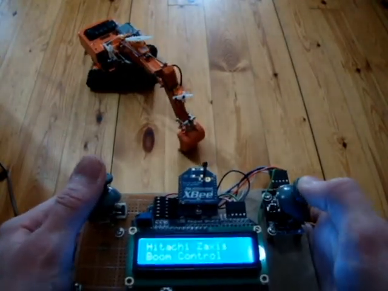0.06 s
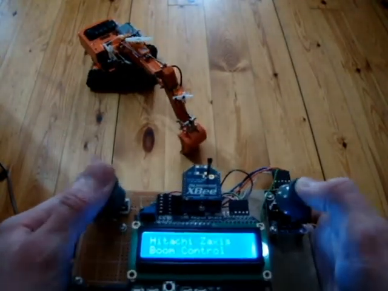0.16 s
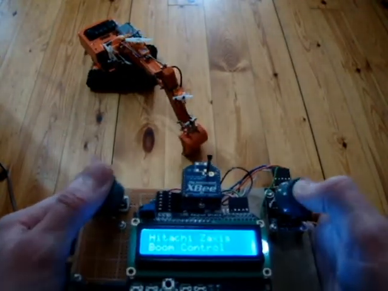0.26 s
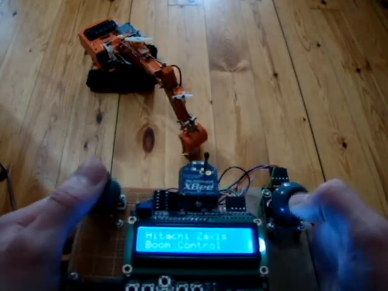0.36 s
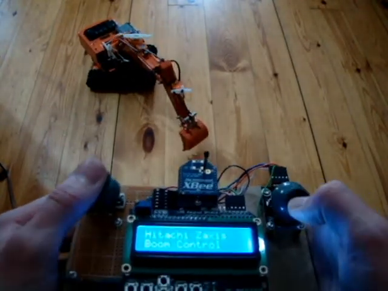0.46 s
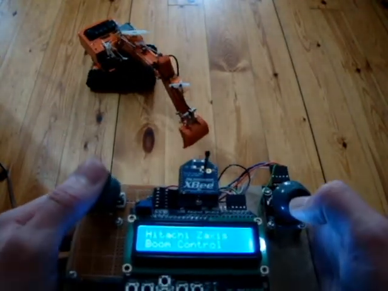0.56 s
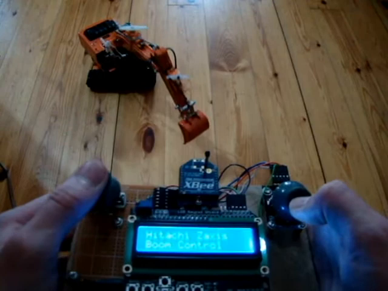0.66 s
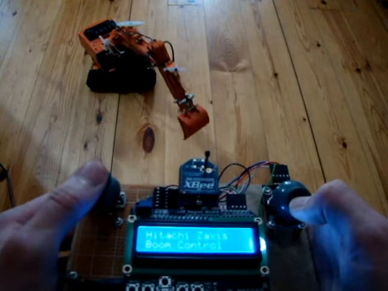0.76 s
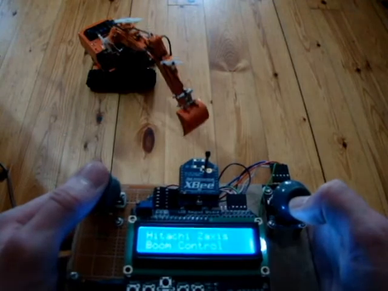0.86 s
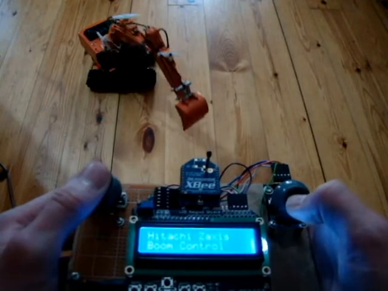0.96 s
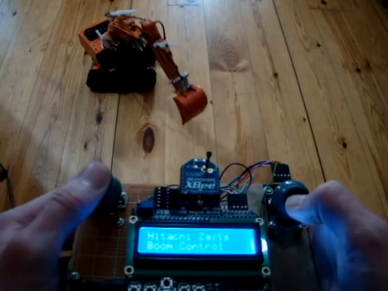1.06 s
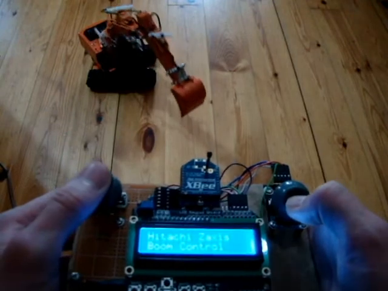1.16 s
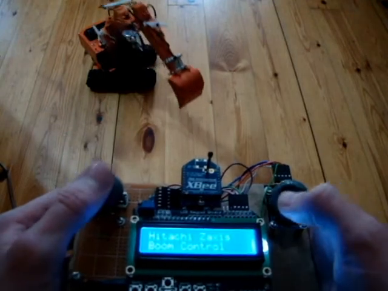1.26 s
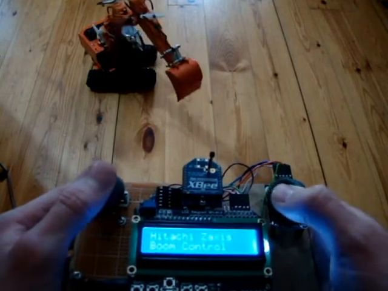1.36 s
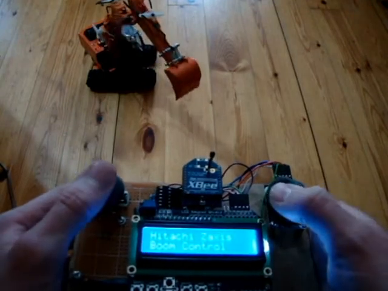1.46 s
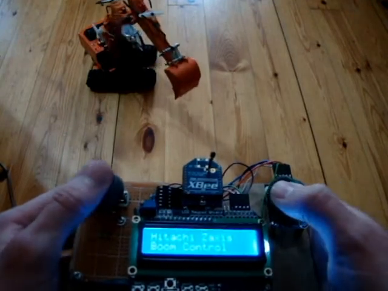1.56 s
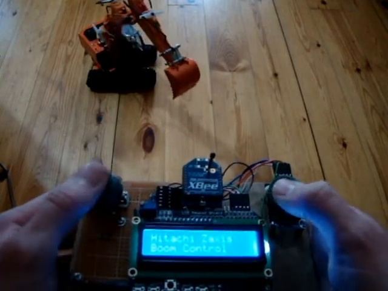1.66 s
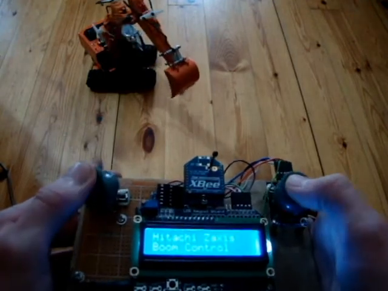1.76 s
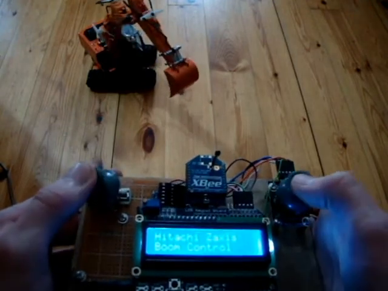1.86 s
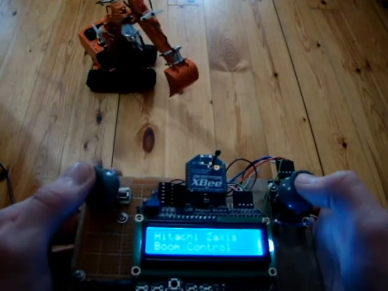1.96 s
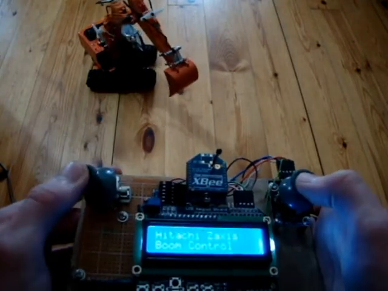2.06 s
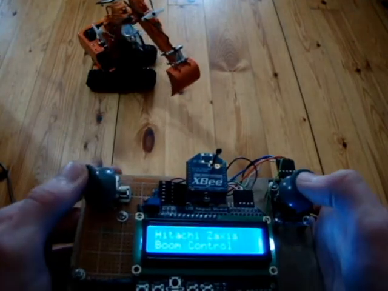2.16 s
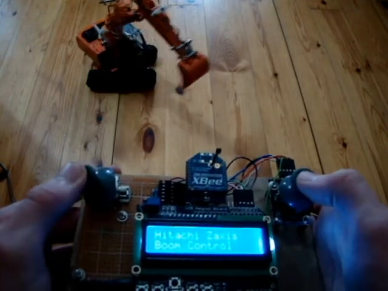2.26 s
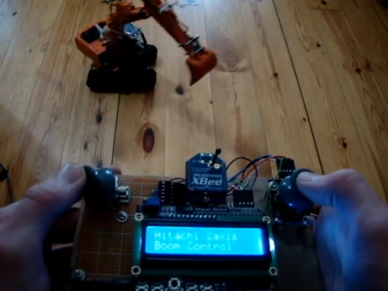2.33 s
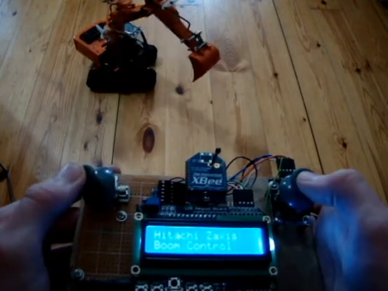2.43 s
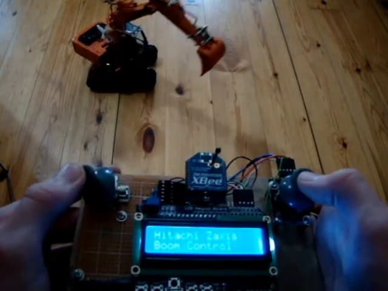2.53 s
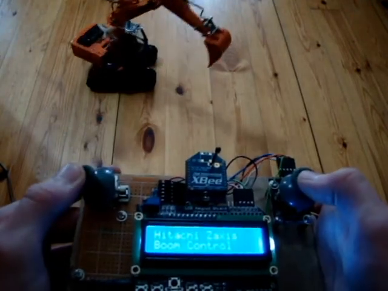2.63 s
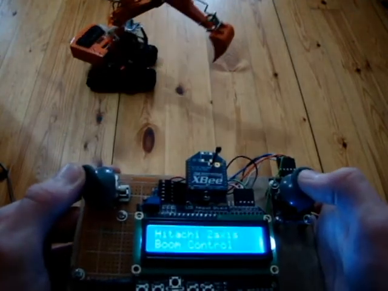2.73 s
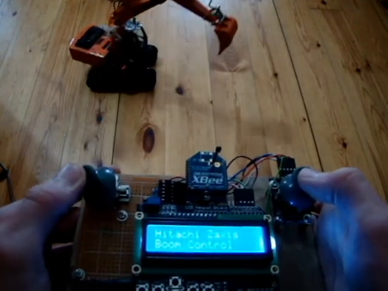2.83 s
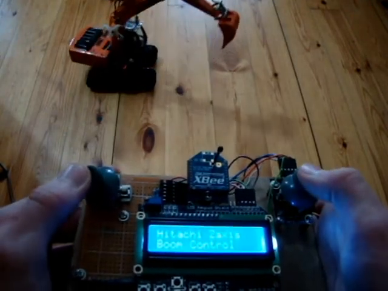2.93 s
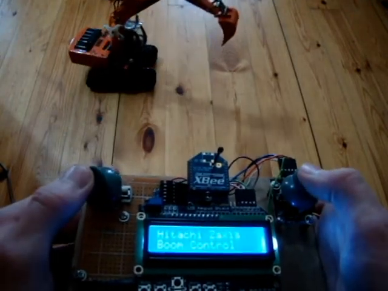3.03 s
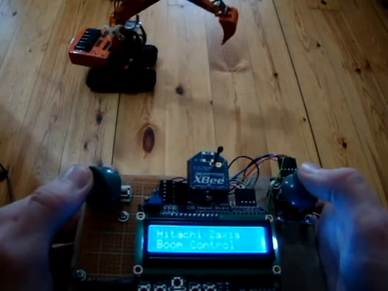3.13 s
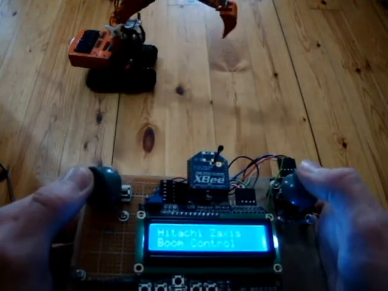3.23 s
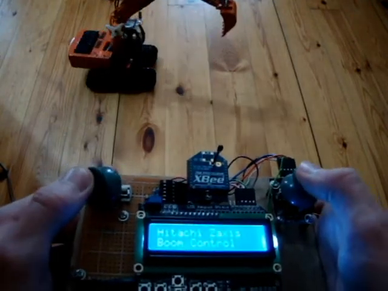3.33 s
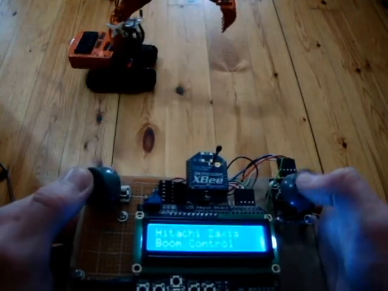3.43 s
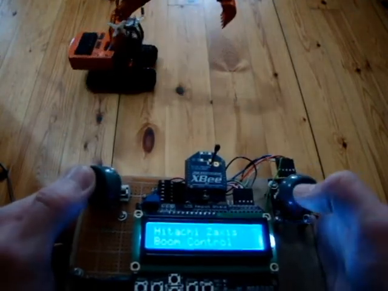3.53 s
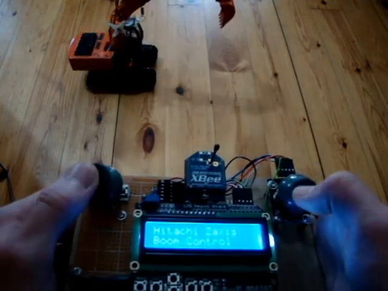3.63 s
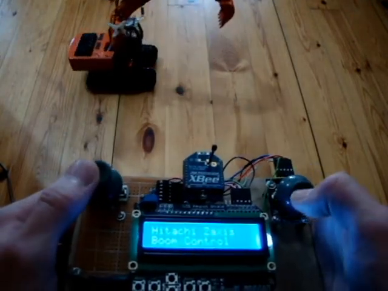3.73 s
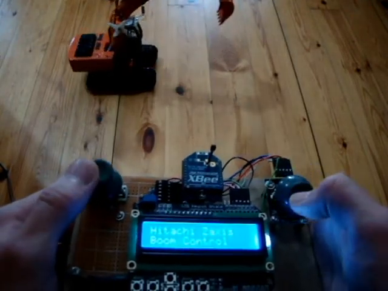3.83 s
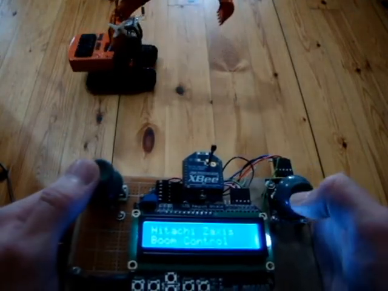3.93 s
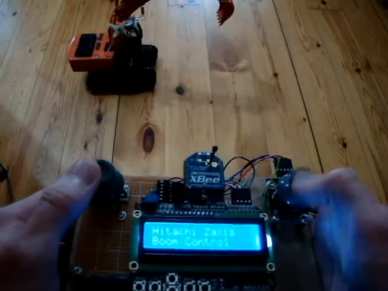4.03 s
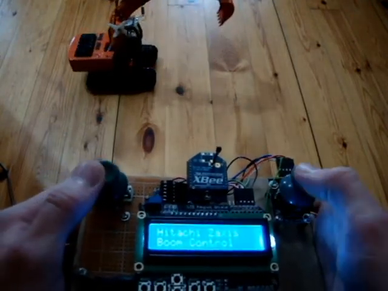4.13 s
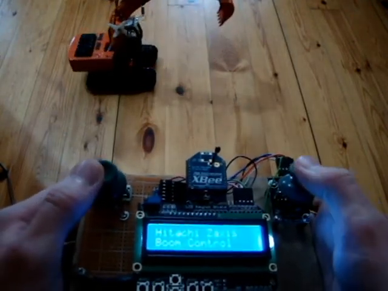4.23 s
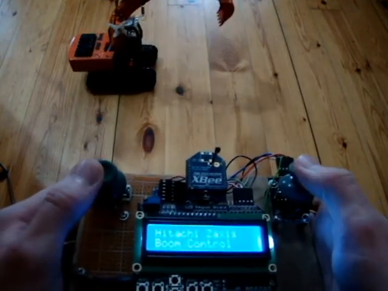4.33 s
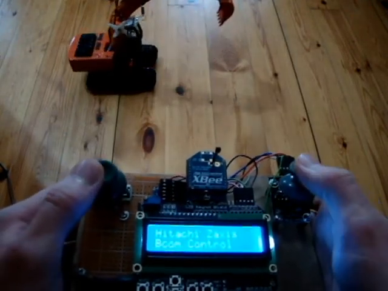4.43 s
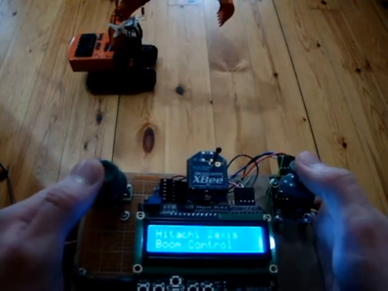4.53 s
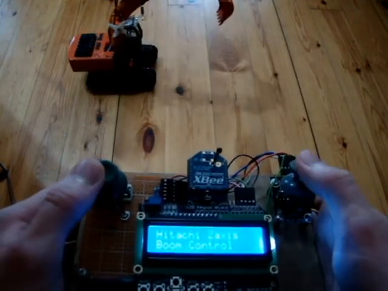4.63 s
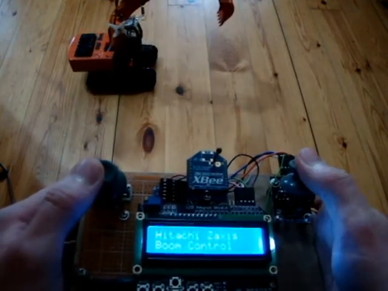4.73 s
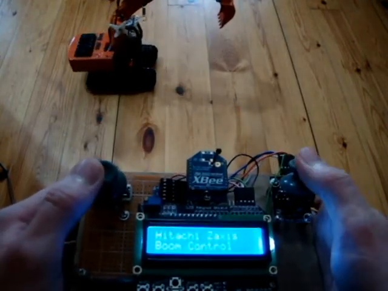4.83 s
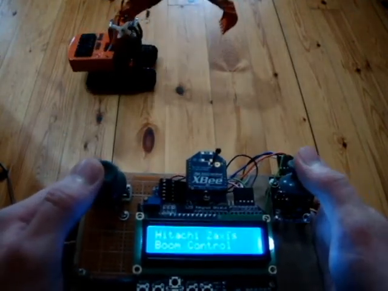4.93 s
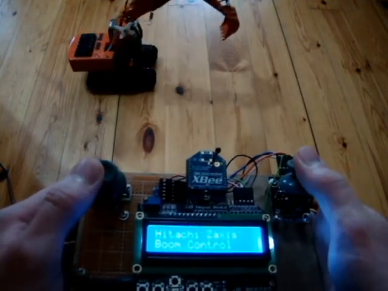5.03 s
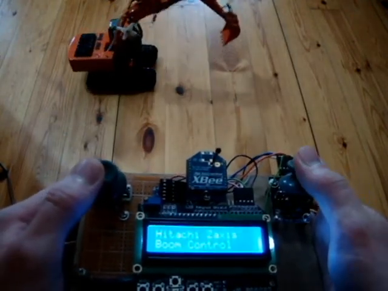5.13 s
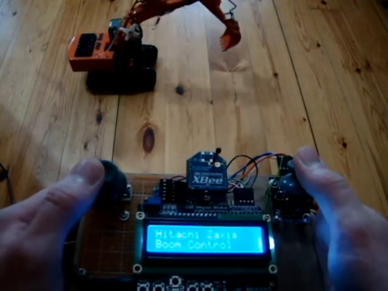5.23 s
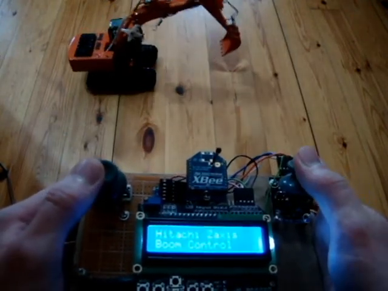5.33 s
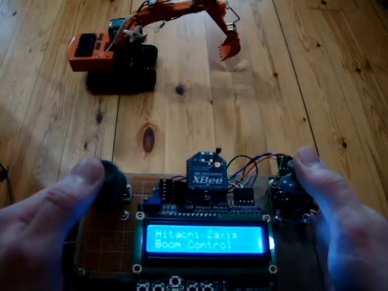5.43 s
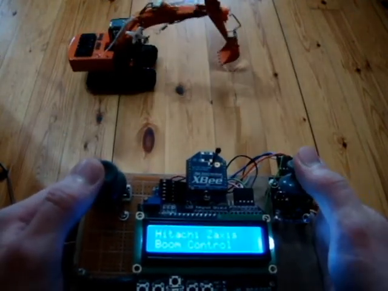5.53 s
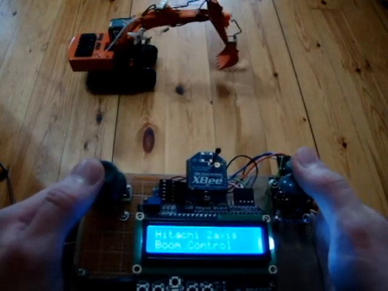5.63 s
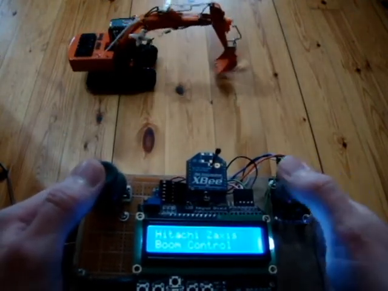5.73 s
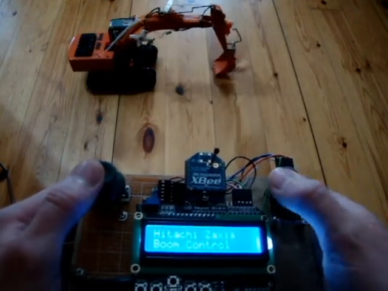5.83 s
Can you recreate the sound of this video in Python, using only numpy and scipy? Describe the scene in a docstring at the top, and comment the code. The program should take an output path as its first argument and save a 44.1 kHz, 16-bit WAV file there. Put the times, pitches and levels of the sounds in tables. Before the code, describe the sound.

Indoors, about a metre from the microphone, a model excavator moves its bucket and boom with a pulsing electric buzz and uneven gear rattle, then swings more loudly, tapping on the floorboards. After a joystick click and a short lull, the arm moves with a higher rasp and a few sharp ticks. A faint car passes outside near the end, and soft room hiss runs underneath.

```python
"""Hobby servos move a toy excavator on a wooden floor, a metre from a small camera in a hissing room.
First the bucket and then the boom move: each servo is pushed 50 times a second, and its gears rattle
in the plastic case, jerk under load and knock the chassis. The bucket moves again while a holding
servo buzzes. The body swings, a thumb stick clicks and the gears fall almost quiet. Last the dipper
arm moves as a car rolls by outside. Throughout, a hollow note near 1 kHz comes and goes in the hiss."""
import sys
import numpy as np
from scipy import signal
from scipy.fft import rfft, irfft, next_fast_len
from scipy.io import wavfile
from scipy.ndimage import uniform_filter1d

SR = 44100
rng = np.random.default_rng(int(sys.argv[2]) if len(sys.argv) > 2 else 0)


def dump_mix(stems):
    """Bounce the given channels to the path in sys.argv[1] as a 16-bit WAV at rate SR."""
    frames = np.atleast_2d(stems).T  # one column per channel
    limited = np.clip(frames, -1, 1)  # hard clip at full scale
    pcm = np.round(limited * 32767).astype(np.int16)
    wavfile.write(sys.argv[1], SR, pcm)


N = 259308

# servo effort, one curve per move (bucket, boom, bucket, swing, dipper): time_s, effort_db
EFFORTS = [
    [(0.0, -1), (0.225, -3)],
    [(0.225, -9.5), (0.38, -4.5), (0.62, -0.5), (0.86, -3), (1.14, -2.5), (1.33, -4), (1.42, -10.5)],
    [(1.42, 2.5), (1.75, -3.5), (2.078, -4.5)],
    [(2.08, -3), (2.14, -1), (2.89, -0.5), (3.07, -3), (3.36, -2.5), (3.68, -3.5), (3.8, -7), (3.95, -24),
     (4.42, -26)],
    [(4.42, -32), (4.49, -9.5), (4.65, -4), (4.93, -2.5), (5.21, 0), (5.58, -3), (5.88, -1.5)],
]
# each move at 0 dB effort: growl_db, case_db, treble_db, drone_db, push_depth_db
MOVE_LEVELS = [(-52, -45.5, -52, -63, 5.5), (-52, -48, -54, -61.5, 10), (-59, -55.5, -59.5, -74, 11.5),
               (-46.5, -44, -51, -60.5, 5), (-53, -45.5, -57, -69, 9.5)]
# drive of each move: push_centre_frames, push_sharpness, running_rattle_db, jerk_rattle_db
DRIVES = [(0.3, 3, 3, -4), (0.75, 1.06, -0.5, -3), (0.06, 20, 11, -4.5), (0.64, 1.15, 12, -8.5),
          (0.98, 10, 5, -3.5)]
# resonances of each servo's case: pitch_hz, gain_db
BUCKET_MODES = [(2650, -4.5), (3090, -21), (3470, 3.5), (5850, -2.5), (6330, -18), (8300, -7.5),
                (8700, -13)]
BOOM_MODES = [(2390, -3.5), (3640, 3.5), (3830, -1), (4140, -0.5), (4700, -15), (5030, -2), (8300, -18)]
SWING_MODES = [(2490, -10), (3250, -4), (3470, -1.5), (3980, 0), (4440, -7), (4750, -2.5), (6940, -14),
               (7800, -12.5)]
DIPPER_MODES = [(3600, 4), (3750, 7.5), (4250, 3), (4430, 3), (5230, -7), (5770, -2), (6660, 5), (7800, 5),
                (8630, -6), (9000, 9)]
# broad rattle spectrum under those resonances: frequency_hz, gain_db
BUCKET_RATTLE = [(880, -48), (1500, -9), (1760, -14), (2270, -2.5), (3420, -6.5), (4670, -9.5), (5830, -8),
                 (10000, -12), (13000, -34), (22000, -120)]
BOOM_RATTLE = [(880, -46), (1500, -18.5), (2320, -6), (3040, -7), (3710, 1), (5090, -2.5), (6780, -12),
               (10000, -10), (13000, -47), (22000, -120)]
SWING_RATTLE = [(880, -35), (1500, -18.5), (2850, -10.5), (3340, -4), (4630, -0.5), (5690, -7.5),
                (6830, -6), (10000, -11.5), (13000, -41), (22000, -120)]
DIPPER_RATTLE = [(880, -42), (1500, -22.5), (2680, -12.5), (3270, -10), (3710, -4.5), (5470, -2.5),
                 (8950, 9.5), (10000, 4.5), (13000, -31), (22000, -120)]
# gears jerking under load: peak_s, level_db, half_length_s, treble_over_case_db
JERKS = [(0.085, -41, 0.0045, 4), (0.175, -36, 0.022, -9), (0.292, -37, 0.003, -5),
         (0.315, -34, 0.0044, -4), (0.35, -37, .005, 0), (0.412, -37, 0.0032, 1), (0.431, -40, 0.0028, 3),
         (0.454, -36.5, .005, -12), (0.473, -31.5, 0.0042, -7), (0.493, -33.5, .007, -3),
         (0.554, -36, 0.0045, -2), (0.574, -34.5, .0055, -3), (0.594, -36.5, 0.0057, -5),
         (0.61, -36, 0.0045, 2), (0.638, -42, .007, -8), (0.674, -40.5, 0.0095, -2),
         (0.694, -38, 0.0085, 2), (0.715, -38, .007, -2), (0.734, -42, 0.0062, 3), (0.834, -42.5, .009, 0),
         (0.851, -36, 0.01, 2), (0.955, -34, .006, 0), (0.979, -35.5, 0.0051, 0),
         (0.994, -38.5, 0.0078, -6), (1.069, -36.5, 0.0093, -1), (1.093, -38, .0066, -1),
         (1.116, -38.5, 0.012, 0), (1.176, -34, 0.0072, 4), (1.198, -37, 0.015, 1),
         (1.217, -36, 0.014, 5.5), (1.285, -41, 0.017, 10), (1.374, -41.5, 0.01, 10),
         (1.484, -41, 0.0055, 14), (1.523, -34.5, 0.0036, 2.5), (1.552, -33, 0.0046, 13),
         (1.608, -44, .02, 20), (1.675, -37.5, .013, 16), (1.706, -44.5, 0.013, 5), (1.751, -47.5, .01, 15),
         (1.801, -41, .004, 2), (1.821, -38, .002, 5), (1.92, -41, .003, 4), (2.088, -33, 0.005, -2.5),
         (2.108, -27, 0.0041, -14), (2.153, -31, 0.0095, -9), (2.17, -34.5, 0.0071, -10),
         (2.22, -31, 0.0067, -5), (2.236, -23.5, 0.013, -9), (2.266, -25.5, 0.0026, -2),
         (2.331, -31.5, 0.012, -4), (2.415, -25.5, 0.0055, -8.5), (2.462, -35, 0.022, -7.5),
         (2.525, -35, 0.021, -3), (2.556, -29.5, 0.014, -8), (2.599, -27, 0.0013, 7),
         (2.632, -27.5, 0.013, -5.5), (2.694, -33, 0.01, -4), (2.72, -34.5, 0.015, -2),
         (2.797, -31, 0.017, -1), (2.887, -32.5, 0.0097, 0), (2.968, -39.5, 0.014, 6),
         (2.995, -36.5, 0.0065, -4), (3.121, -36.5, 0.017, -1), (3.221, -34, 0.019, -3.5),
         (3.304, -41, 0.023, -6), (3.385, -32, 0.017, -2.5), (3.457, -36.5, 0.023, -1.5),
         (3.773, -39.5, 0.028, -5.5), (3.855, -51, .004, 4), (3.944, -47, .006, -1),
         (3.981, -49.5, 0.0033, 1), (4.046, -49.5, 0.0071, -7), (4.36, -43, 0.0016, 7.5),
         (4.398, -45, 0.0017, 6), (4.437, -45.5, .006, -2), (4.479, -39, 0.012, -7),
         (4.516, -30, 0.008, -4.5), (4.535, -38, 0.018, -6), (4.741, -41.5, 0.0092, -4),
         (4.849, -34, 0.0099, 2.5), (4.895, -32, 0.0062, -4), (4.932, -33, 0.012, 1.5),
         (4.998, -36, 0.017, -3), (5.017, -32.5, 0.0049, 0), (5.07, -28.5, 0.0075, -2),
         (5.113, -34, 0.007, 4), (5.151, -34.5, 0.015, 2.5), (5.195, -34, 0.0056, -18),
         (5.215, -30.5, 0.008, -0.5), (5.272, -33, 0.0088, 2), (5.331, -35, 0.0099, 1),
         (5.374, -33.5, .008, -4), (5.393, -32.5, 0.011, -0.5), (5.416, -33, 0.0065, 5),
         (5.474, -30, 0.0051, 4), (5.506, -28, 0.0079, 9.5), (5.555, -22.5, .0055, 5.5),
         (5.574, -34.5, 0.011, -3), (5.596, -35, 0.0067, 5), (5.619, -41.5, 0.017, 2),
         (5.669, -37.5, .007, 13), (5.711, -26, 0.0079, 9)]
# chassis knocking on the boards: start_s, level_db, top_mode_boost_db
KNOCKS = [(0.202, -38, 2), (0.295, -32, -10), (0.567, -37, -14), (1.28, -34.5, 5.5), (2.24, -29.5, -3),
          (2.332, -32.5, -14), (2.43, -27.5, -20), (2.633, -29.5, -19), (2.956, -33.5, 2.5),
          (3.194, -34, 2), (3.395, -36, -6), (3.464, -36, -4), (3.809, -50, 13), (3.852, -47, 16),
          (4.451, -43.5, 17), (5.496, -38, 9), (5.594, -29, 2)]
# modes of the chassis: pitch_hz, gain_db, t60_s
CHASSIS_MODES = [(327, -10.5, 0.095), (441, -6.5, 0.035), (589, -11, 0.056), (1000, -4, 0.042)]
# thumb stick clicks: start_s, level_db, pitch_hz
CLICKS = [(3.7531, -29.5, 1720), (5.635, -38, 1830), (5.805, -39.5, 1850)]
# case resonances of the holding servo: pitch_hz, width_hz, gain_db
HOLD_MODES = [(2320, 220, -2), (2650, 80, 0), (3000, 250, -6)]
# spectrum of the room hiss: frequency_hz, gain_db
HISS_SPECTRUM = [(15, -46), (25, -24.5), (74, -20), (129, -12.5), (338, -9), (469, -6), (619, -5),
                 (905, -4.5), (1050, -5.5), (1160, -3.5), (1980, -10.5), (9250, -60), (10500, -36.5),
                 (13600, -66), (22000, -120)]
# hollow note in the hiss: time_s, level_db
HOLLOW_LEVELS = [(0.0, -68), (0.36, -52.5), (1.67, -67), (2.44, -52.5), (3.65, -53.5), (3.9, -57.5),
                 (4.35, -51.5), (4.7, -56.5), (5.52, -48.5), (5.88, -49)]
# car outside: time_s, tyre_db, engine_db
CAR_LEVELS = [(0, -58, -70), (2, -73, -76.5), (4.2, -65.5, -73), (4.7, -52, -70), (5.1, -45.5, -63.5),
              (5.5, -52, -62.5), (5.88, -59, -60.5)]

FRAME_HZ = 50  # drive pushes a second
EFFORT_SHARES = (0.66, 1, 0.48)  # dB of growl, case and treble per dB of effort
T = np.arange(N) / SR


def servo(effort, levels, modes, rattle, drive):
    """Forced vibration: gear teeth, pushed once a frame and by jerks, excite the resonances of the case."""
    start, stop = effort[0][0], effort[-1][0]
    span = slice(max(int((start - .1) * SR), 0), min(int((stop + .1) * SR), N))
    t = T[span]
    size = next_fast_len(len(t) + 2048)
    f = bins(size)
    effort_db = curves(effort)[0][span]
    levels_db = [db + share * effort_db for db, share in zip(levels, EFFORT_SHARES)]
    depth_db = np.maximum(levels[4] + 0.094 * effort_db, 0)  # less effort, shallower pushes
    centre, sharpness, running_rattle_db, jerk_rattle_db = drive
    pushes = drive_pushes(t, centre, sharpness)
    gate = uniform_filter1d(((t >= start) & (t < stop)) * 1., size=300, mode="nearest")
    resonances = case_response(f, modes)
    below_3000, below_5500 = (1 / (1 + (f / hz) ** 16) for hz in (3000, 5500))
    bands = (below_3000, below_5500 - below_3000, 1 - below_5500)  # motor growl, case rattle, gear treble
    depth_scales = (.6, .95, 1.4)  # higher bands follow the pushes more deeply
    out = np.zeros(N)
    for db, jerk, scale, passband in zip(levels_db, gear_jerks(start, stop), depth_scales, bands):
        pulsing = 1 + (undb(scale * depth_db) - 1) * pushes
        running = gate * undb(db + 1.75 * wander(24.854)[span]) * pulsing
        # even running mostly rasps; a jerk strikes the case and rings it
        for force, rattle_db in ((running, running_rattle_db), (jerk[span], jerk_rattle_db)):
            noise = rng.standard_normal(len(t))
            roughness_db = 3.5 * rng.standard_normal(len(t)) + 2.24 * wander(200)[span]
            teeth = force * unit_rms(noise * undb(roughness_db))
            power = resonances + (undb(rattle_db) * spectrum(rattle, f)) ** 2
            gain = np.sqrt(power * (passband + 1e-9))
            out[span] += colour(np.pad(teeth, (0, size - len(t))), gain)[:len(t)]
    return out


def drive_pushes(t, centre, sharpness, load_scatter_db=1.45):
    """Amplitude modulation: one smooth push a frame, each meeting a different load."""
    frames = t * FRAME_HZ - centre + .5
    push = (.5 - .5 * np.cos(2 * np.pi * frames)) ** sharpness
    loads = undb(load_scatter_db * rng.standard_normal(int(T[-1] * FRAME_HZ) + 3))
    return push * loads[frames.astype(int) + 1]


def case_response(f, modes, relative_width=.035):
    """Damping: loss in the plastic widens each resonance; the modes add in power."""
    return sum((undb(db) / (1 + (2 * (f - hz) / (relative_width * hz)) ** 2)) ** 2 for hz, db in modes)


def gear_jerks(start, stop, rise_share=0.83, growl_db=-11):
    """Transient excitation: blunt bursts under load, as envelopes for growl, case and treble."""
    case_power, treble_power = np.zeros(N), np.zeros(N)
    for peak_s, db, half_s, treble_db in JERKS:
        if start <= peak_s < stop:
            near = slice(max(int((peak_s - .06) * SR), 0), int((peak_s + .09) * SR))
            lag = T[near] - peak_s
            width_s = np.clip(half_s * np.where(lag < 0, rise_share, 2 - rise_share), .001, .04)
            power = undb(2 * db) * np.exp(-2 * np.abs(lag / width_s) ** 2.3)
            case_share = 1 / (1 + undb(2 * treble_db))
            case_power[near] += power * case_share
            treble_power[near] += power * (1 - case_share)
    case = np.sqrt(case_power)
    return undb(growl_db) * case, case, np.sqrt(treble_power)


def chassis_knocks():
    """Impact excitation: the chassis hits the boards and rings in its low modes."""
    out = np.zeros(N)
    for start, db, boost_db in KNOCKS:
        modes = [(hz, gain_db + boost_db * (hz > 700), t60) for hz, gain_db, t60 in CHASSIS_MODES]
        out += strike(start, db, modes, contact_s=0.0022)
    return out


def thumb_clicks(t60_s=0.029):
    """Impulse response: a brief contact in a thumb stick rings two quickly damped modes."""
    return sum(strike(start, db, [(hz, 0, t60_s), (0.66 * hz, -6, t60_s)], contact_s=0.00035)
               for start, db, hz in CLICKS)


def strike(start, db, modes, contact_s):
    """Free vibration: slightly detuned modes build up over the contact time and decay exponentially."""
    near = slice(int(start * SR), int((start + .4) * SR))
    t = np.maximum(T[near] - start, 0)
    attack = 1 - np.exp(-t / contact_s)
    out = np.zeros(N)
    for hz, gain_db, t60 in modes:
        hz = hz * (1 + .03 * rng.standard_normal())
        decay = np.exp(-np.log(1000) * t / t60)
        out[near] += undb(db + gain_db) * np.sin(2 * np.pi * hz * t) * decay * attack
    return out


def board_drone(pitch_hz=330, width_hz=110, swell_db=-26, swell_lag_s=0.013, swell_s=0.043):
    """Structure-borne sound: running gears hum low in the boards, swelling around each knock."""
    power = np.zeros(N)
    for effort, levels in zip(EFFORTS, MOVE_LEVELS):
        moving = (T >= effort[0][0]) & (T < effort[-1][0])
        power += moving * undb(2 * (levels[3] + EFFORT_SHARES[0] * curves(effort)[0]))
    for start, db, _ in KNOCKS:
        power += undb(2 * (db + swell_db)) * np.exp(-((T - start - swell_lag_s) / swell_s) ** 2)
    hum = unit_rms(ring(ring(rng.standard_normal(N), pitch_hz, width_hz), pitch_hz, width_hz))
    return hum * np.sqrt(power) * undb(1.2 * wander(15))


def holding_buzz(start_s=1.601, stop_s=2.07, level_db=-57.5):
    """Periodic excitation: a servo holding its place rings its case with the same tick every frame."""
    ticks = np.zeros(N)
    ticks[int(start_s * SR):int(stop_s * SR):SR // FRAME_HZ] = 1
    buzz = sum(undb(db) * ring(ring(ticks, hz, width), hz, width) / np.sqrt(width)
               for hz, width, db in HOLD_MODES)
    return undb(level_db) * buzz / np.std(buzz[(T > start_s) & (T < stop_s)])


def wall_echo(sound, t60_s=0.13, wet_db=-15):
    """Reverberation: dense reflections arrive after 4 ms and die away exponentially."""
    t = T[:SR // 2]
    decay = np.exp(-np.log(1000) * t / t60_s) * (t > .004)
    tail = band(rng.standard_normal(len(t)), 260, 2700, order=1) * decay
    return undb(wet_db) * signal.fftconvolve(sound, tail / np.sqrt(np.sum(tail ** 2)))[:N]


def passing_car():
    """Band-limited noise: tyre roar and engine rumble swell and fade as the car rolls by."""
    tyre_db, engine_db = curves(CAR_LEVELS)
    tyres = unit_rms(band(rng.standard_normal(N), 705, 1324)) * undb(tyre_db + 2.4 * wander(5.6))
    engine = unit_rms(band(rng.standard_normal(N), 57, 330)) * undb(engine_db)
    return tyres + engine


def room_hiss(hiss_db=-53.5):
    """Filtered noise: a steady broad hiss, and a narrow resonance heard as a wavering hollow note."""
    hiss = unit_rms(colour(rng.standard_normal(N), spectrum(HISS_SPECTRUM, bins(N))))
    hollow = unit_rms(ring(rng.standard_normal(N), pitch_hz=1015, width_hz=90))
    return hiss * undb(hiss_db) + hollow * undb(curves(HOLLOW_LEVELS)[0] + 2.0 * wander(17))


def undb(db):
    """Amplitude ratio of a level in dB."""
    return 10 ** (np.asarray(db) / 20)


def unit_rms(x):
    """Normalisation to rms 1."""
    return x / np.sqrt(np.mean(x ** 2))


def band(x, lo_hz, hi_hz, order=2):
    """Band-pass filter."""
    return signal.sosfilt(signal.butter(order, [lo_hz, hi_hz], "bandpass", fs=SR, output="sos"), x)


def ring(x, pitch_hz, width_hz):
    """Second-order resonance, gain 1 at its centre."""
    return signal.lfilter(*signal.iirpeak(pitch_hz, pitch_hz / width_hz, fs=SR), x)


def wander(rate_hz):
    """Random fluctuation: held steps smoothed twice, with a spread near 1."""
    hold = int(SR / rate_hz)
    steps = np.repeat(rng.standard_normal(N // hold + 1), hold)
    return 1.18 * uniform_filter1d(uniform_filter1d(steps, hold), hold)[:N]


def curves(table):
    """Linear interpolation of a table's columns in time."""
    times, *columns = np.transpose(table)
    return [np.interp(T, times, column) for column in columns]


def colour(x, gain):
    """Minimum-phase filter: the gain per bin, scaled to rms 1, is made causal by folding its cepstrum."""
    n = len(x)
    cepstrum = irfft(np.log(unit_rms(gain)), n)
    cepstrum[1:n // 2] *= 2
    cepstrum[n // 2 + 1:] = 0
    return irfft(rfft(x) * np.exp(rfft(cepstrum)), n)


def spectrum(points, f):
    """Spectral envelope: gain at f, interpolated in dB over log frequency."""
    hz, db = np.transpose(points)
    return undb(np.interp(np.log(f), np.log(hz), db))


def bins(size):
    """Frequencies of a transform of that size, at least 1 Hz."""
    return np.maximum(np.arange(size // 2 + 1) * SR / size, 1)


def scene():
    """Superposition: the toy, its echo from the walls, the room hiss and the car add at one point."""
    modes = (BUCKET_MODES, BOOM_MODES, BUCKET_MODES, SWING_MODES, DIPPER_MODES)
    rattles = (BUCKET_RATTLE, BOOM_RATTLE, BUCKET_RATTLE, SWING_RATTLE, DIPPER_RATTLE)
    impacts = band(chassis_knocks() + thumb_clicks(), 280, 6000)
    toy = impacts + board_drone() + holding_buzz()
    toy += sum(servo(*move) for move in zip(EFFORTS, MOVE_LEVELS, modes, rattles, DRIVES))
    return (toy + wall_echo(toy) + room_hiss() + passing_car())[None]


def record(dry):
    """Band limiting: the camera cuts the treble steeply above 10 kHz."""
    return signal.sosfilt(signal.ellip(12, .2, 75, 10010, fs=SR, output="sos"), dry)


dry = scene()
out = record(dry)
dump_mix(out)
```